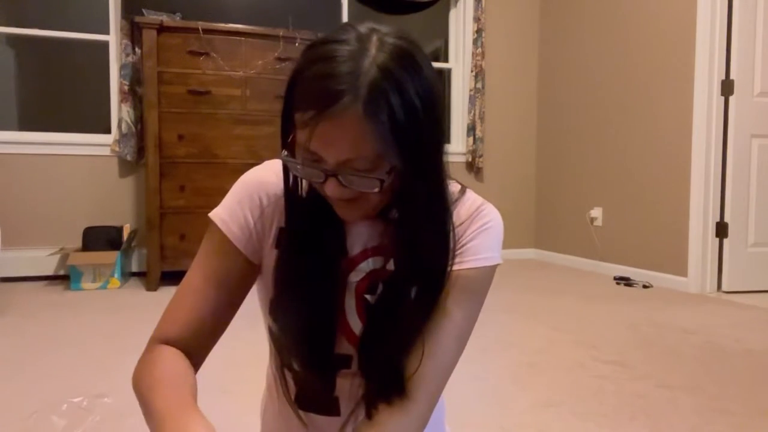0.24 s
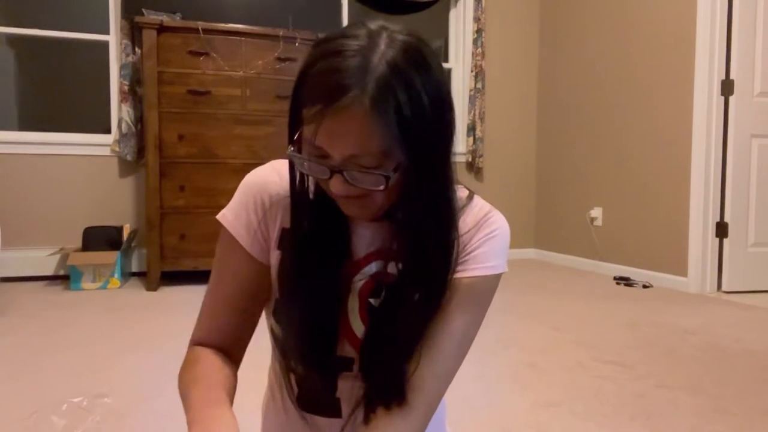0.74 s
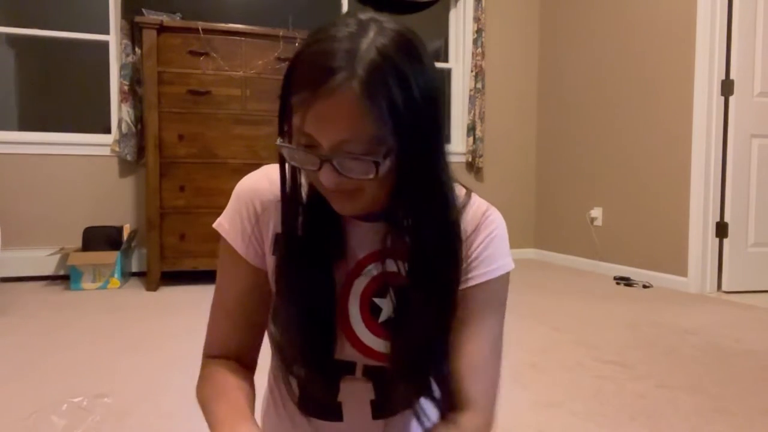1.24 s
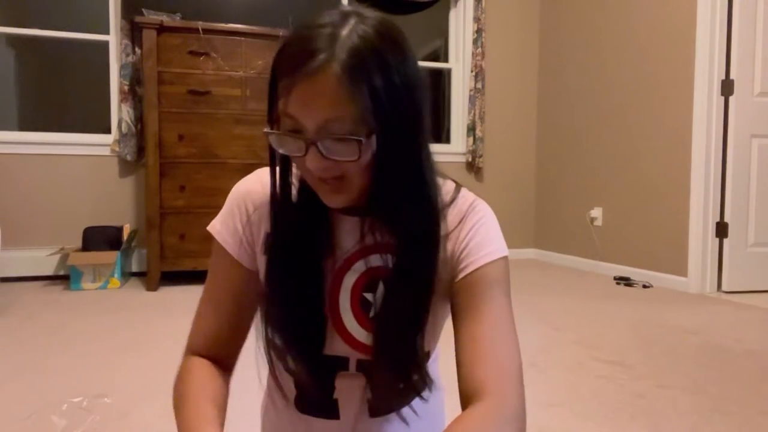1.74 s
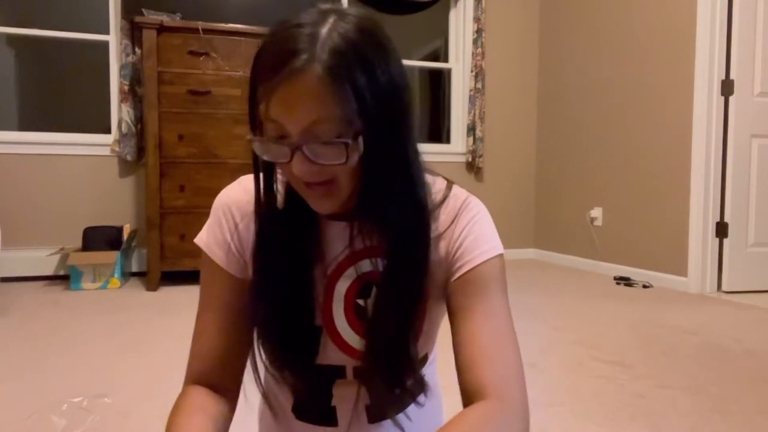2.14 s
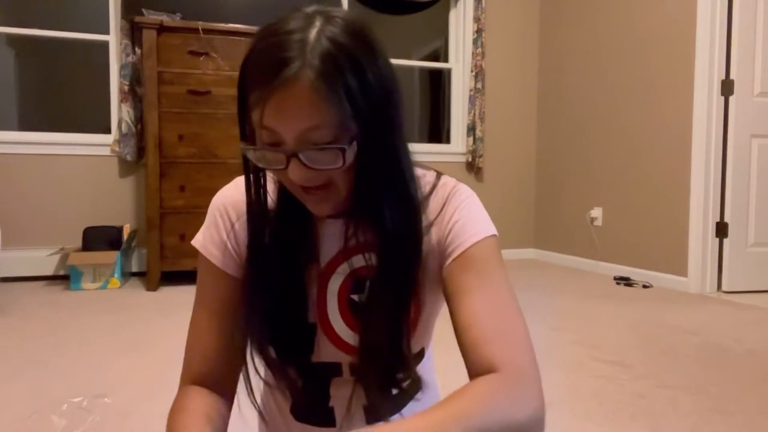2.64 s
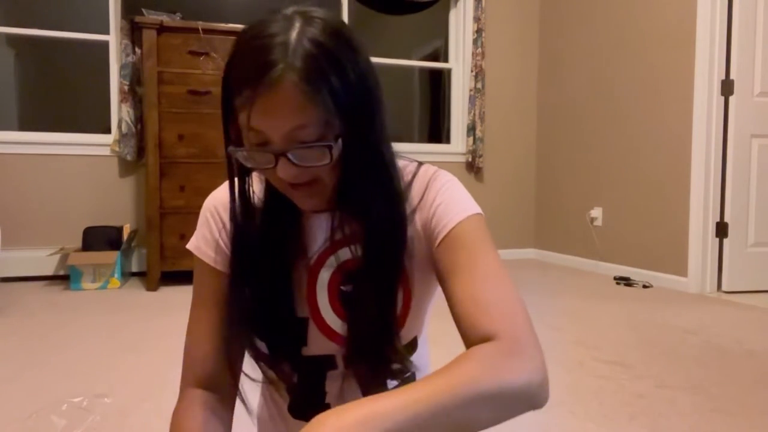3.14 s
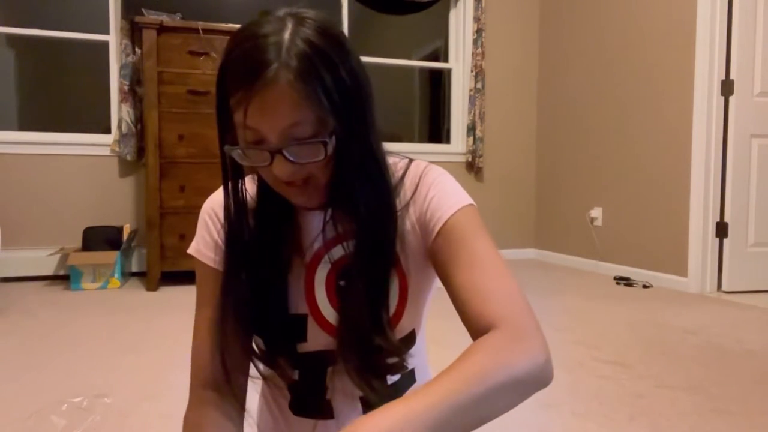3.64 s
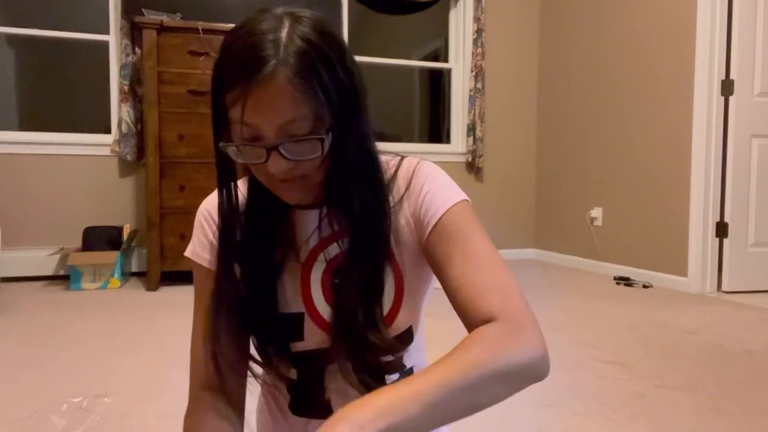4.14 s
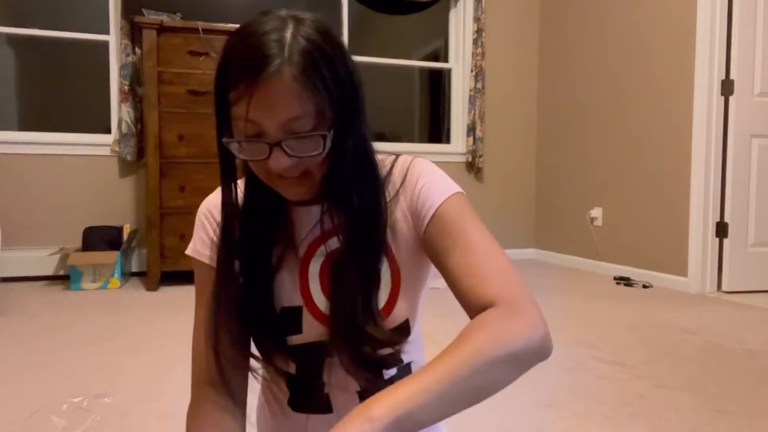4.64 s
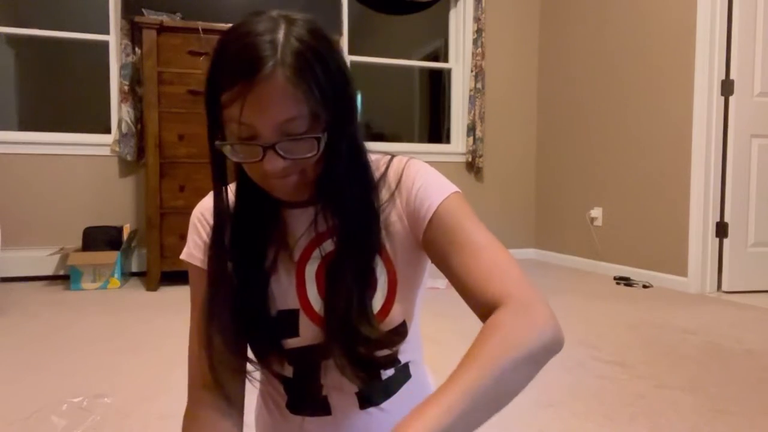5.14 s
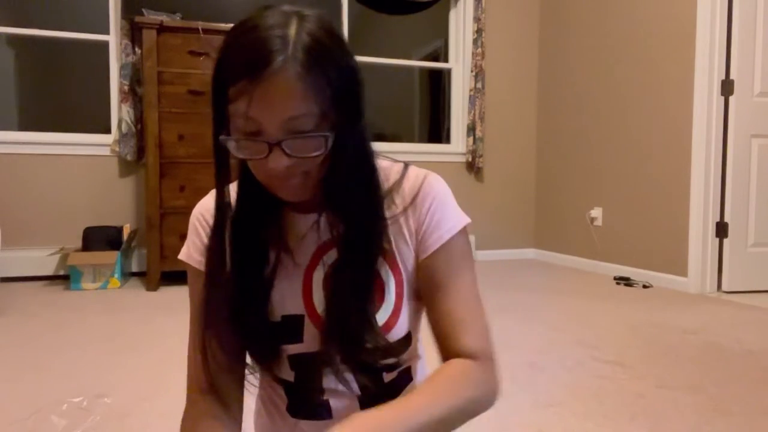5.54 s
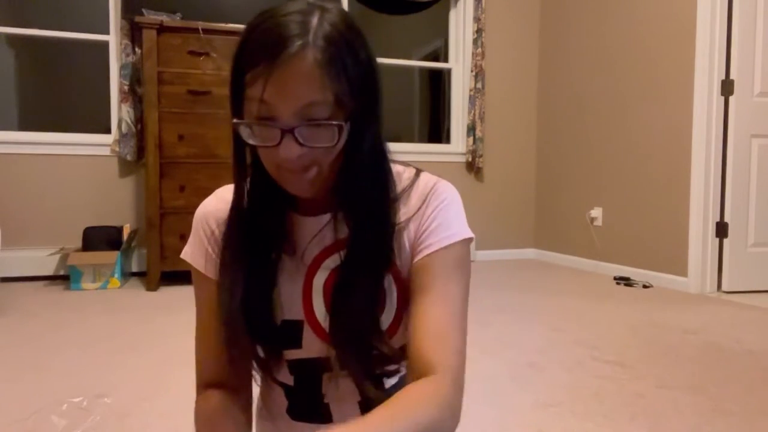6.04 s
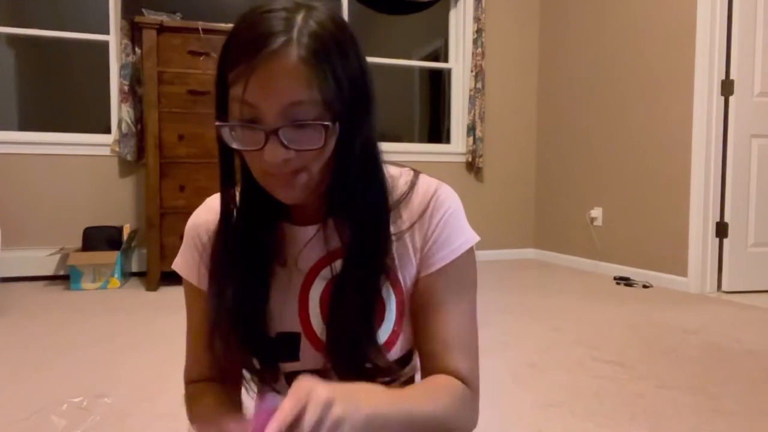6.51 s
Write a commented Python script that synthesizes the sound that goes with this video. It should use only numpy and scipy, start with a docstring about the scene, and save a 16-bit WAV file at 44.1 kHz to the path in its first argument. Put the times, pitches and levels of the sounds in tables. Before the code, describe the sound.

A cardboard box is pulled open by hand, close to a stereo microphone in a quiet carpeted bedroom with a faint hush. At about 0.06 and 0.33 s two short falling squeaks sound among hollow knocks and a few ticks; then near quiet until 0.9 s. From 1 to 2.5 s light snaps, papery rustle and dull wall slips come irregularly, busier near 1.8-2 s. A firm snap lands at 2.6 s, crackle builds from 2.8 s, and two loud bright cracks hit at 3.23 and 3.49 s. Small ticks follow, with a faint rough creak near 4 s, sharp pops around 4.3 s, a strong crackling rip at 4.7 s and a tight burst of cracks at 5.0 s. Soft low thumps lie beneath. After 5.5 s only hollow bumps, light rustle, one small snap near 6.57 s and muffled carpet scuffs from 6.1 s remain.

```python
"""Fibres and glue snap one by one or rip in bursts as hands work a cardboard box open on a bedroom carpet.
Snaps are short noise cracks over ringing flaps; rustle and box boom are grainy noise driven by the tugs.
Walls slip with gritty decaying tones and squeak with gliding ones; the base scuffs the pile in dull hiss.
Weight thumps the floor with one wavering low note. A two-port microphone hears it all close from above,
with a little room and a faint hush."""
import sys
import numpy as np
from scipy import signal
from scipy.fft import rfft, irfft, next_fast_len
from scipy.io import wavfile
from scipy.ndimage import uniform_filter1d

SR = 44100
rng = np.random.default_rng(int(sys.argv[2]) if len(sys.argv) > 2 else 0)


def wav_out(sig):
    """Save sig, one row per channel (or a flat mono array), as 16-bit PCM at SR to the path in sys.argv[1]."""
    wavfile.write(sys.argv[1], SR, np.round(np.clip(np.atleast_2d(sig).T, -1, 1) * 32767).astype(np.int16))


N = 298682  # length in samples

# Single snaps. Each row: time of the crack's peak in seconds, peak of the flap layer in dB,
# pitch of the freed flap in Hz, board note relative to the flap layer in dB.
SNAPS = [(.185, -51, 3000, -11), (0.298, -41, 2070, -29), (0.433, -43, 3580, -24), (0.4439, -32, 3900, -28),
         (1.0056, -40, 2060, -13.5), (1.148, -38.5, 2500, -10), (1.499, -34, 2340, -48),
         (1.5837, -40.5, 2140, -17), (1.7718, -36.5, 2620, -11), (1.7875, -32, 1720, -9),
         (1.839, -37.5, 2460, -8), (1.922, -41, 1940, -18), (2.0193, -37, 1590, -11),
         (2.185, -35.5, 6600, 1.5), (2.217, -34.5, 1890, -4), (2.472, -39, 1810, -10),
         (2.488, -43.5, 1860, -16), (2.505, -42.5, 1920, -15), (2.608, -24.5, 1960, -6.5),
         (2.769, -47.5, 3000, -9), (2.82, -36.5, 6300, -52), (2.857, -31, 4800, -37),
         (2.917, -33.5, 4030, -38), (2.946, -43.5, 4000, -42), (2.979, -39.5, 2940, -37),
         (3.1186, -39.5, 3800, -12.5), (3.1812, -40.5, 1900, -6.5), (3.193, -48, 2000, -4),
         (3.2084, -37.5, 3920, -21), (3.2155, -36, 3600, -12), (3.2277, -10, 2920, -21.5),
         (3.42, -46, 2100, -31), (3.4492, -39, 1550, -6), (3.459, -32.5, 3500, -11),
         (3.4915, -12.5, 5360, -29), (3.547, -45, 3000, -5), (3.5646, -37, 3000, -2),
         (3.664, -48, 2960, -2), (3.699, -46.5, 2480, -4), (3.742, -43, 3650, -11), (3.757, -47.5, 5000, 1),
         (3.777, -49, 2500, 3), (3.854, -39, 1340, -0.5), (3.893, -40.5, 1530, 1),
         (3.9256, -49.5, 1980, 2.5), (3.974, -45.5, 3100, -11), (3.986, -40.5, 5000, -20),
         (3.999, -42.5, 2120, -32), (4.011, -34, 1960, -9), (4.033, -53, 1590, -14),
         (4.165, -55.5, 2000, -8), (4.18, -45, 2000, -8), (4.2702, -26, 1600, -8),
         (4.3229, -22.5, 5060, -32), (4.3263, -17, 6050, -13), (4.3522, -30.5, 6900, -30),
         (4.4123, -33, 1710, -5.5), (4.675, -37.5, 1890, -11), (4.693, -32, 2270, -11),
         (4.727, -27, 1750, -7), (4.7403, -21, 1790, -13), (4.769, -22.5, 5500, -38),
         (4.854, -47.5, 2700, -18), (4.873, -42.5, 2610, -15), (4.897, -42.5, 2940, -30),
         (4.944, -42.5, 2570, -19), (4.9656, -32, 2460, -30), (4.982, -29, 5940, -35),
         (5.0061, -16.5, 6160, -64), (5.017, -16, 6200, -42), (5.019, -15.5, 4920, -38),
         (5.0233, -19, 3170, -22), (5.4201, -41.5, 3680, -6), (5.467, -36, 3305, -12),
         (6.5667, -38, 3350, -4.5)]
# Resonances of the flaps around a snap. Each row: pitch in Hz, relative level in dB.
FLAP_MODES = [(1750, -22.5), (2030, -0.5), (2650, -2), (3400, -10.5), (4700, -6), (6500, 6)]
SNAP_S, SNAP_SLOWING = 0.0002, 0.035  # parting time at full scale; weak snaps lengthen it, fraction per dB
CRACK_DB, CRACK_GROWTH = -3.5, 0.0222  # bright crack against the flap layer; dB more per dB of snap level
GRIT_DB, GRIT_GROWTH = -8, -0.26  # grit against the swing; negative growth makes weak snaps grittier
FLAP_CYCLES = 1  # the swing fades by a factor e in this many cycles
FLAP_T60_CYCLES = 45  # each mode drops 60 dB in this many of its own cycles
FLAP_REACH_DB = 11  # modes fade this much per octave from the flap's pitch
FLAP_RING_DB, FLAP_SCATTER = -8.5, 0.03  # modes against the swing; largest pitch shift as a fraction

# Tugs and rips. Each row: peak in seconds, rise in seconds, fibre crackle in dB, board ring in dB,
# hollow boom in dB.
TUGS = [(0.073, 0.03, -57, -55.5, -49.5), (0.179, 0.18, -64.5, -102, -65), (0.296, 0.016, -64, -66, -59.5),
        (0.363, 0.057, -54, -55, -64), (0.456, 0.078, -55.5, -54.5, -63.5), (0.911, 0.055, -63.5, -66, -92),
        (1.087, 0.0074, -58, -59, -72), (1.15, 0.022, -81, -57, -61), (1.267, 0.19, -49, -64, -65),
        (1.499, 0.016, -55, -67, -64.5), (1.587, 0.053, -55, -68, -69), (1.663, 0.052, -59, -66.5, -93),
        (1.782, 0.013, -45.5, -50.5, -39.5), (1.93, 0.013, -56.5, -80, -69),
        (1.987, 0.1, -57.5, -53, -41.5), (2.038, 0.17, -57.5, -56, -62), (2.205, 0.021, -49.5, -50, -58),
        (2.336, 0.3, -62, -62, -63), (2.4, 0.086, -64, -59.5, -81), (2.609, 0.011, -43, -48, -42.5),
        (2.874, 0.057, -40, -59, -68), (3.245, 0.047, -44.5, -54, -57.5), (3.457, 0.019, -44.5, -61, -74),
        (3.505, 0.024, -43.5, -81, -84), (3.61, 0.0067, -54.5, -81, -84), (3.78, 0.17, -58, -65, -80),
        (4.019, 0.035, -49, -47, -86), (4.183, 0.0045, -53, -52, -60), (4.332, 0.084, -49.5, -48, -42),
        (4.428, 0.044, -63, -55.5, -49), (4.696, 0.012, -51, -45, -40), (4.738, 0.03, -34, -41, -44.5),
        (4.87, 0.14, -89, -64, -44.5), (5.023, 0.083, -43, -48, -44.5), (5.16, 0.031, -68, -68, -59.5),
        (5.466, 0.14, -60, -57.5, -56), (5.724, 0.081, -67, -57.5, -47.5),
        (5.882, 0.052, -61.5, -62.5, -56), (6.115, 0.0087, -67, -56.5, -46.5),
        (6.151, 0.068, -56.5, -63, -62), (6.421, 0.1, -81, -79, -53), (6.48, 0.063, -61.5, -74, -58),
        (6.58, 0.033, -62.5, -83, -54.5), (6.72, 0.058, -56, -64.5, -52)]
# Restless hands. Each row: time in seconds, crackle between tugs in dB, board ring between tugs in dB.
HANDLING = [(0, -99, -70), (.2, -70, -86), (.24, -105, -105), (.275, -64, -99), (.645, -98, -62.5),
            (.7, -111, -90), (.85, -105, -78.5), (1.06, -63, -66), (1.45, -80, -78), (2.14, -74, -69),
            (2.42, -67, -63.5), (2.76, -73, -73), (3.05, -57, -66), (3.39, -81, -65.5), (3.65, -77, -64.5),
            (4.15, -73, -63.5), (4.56, -57, -55.5), (4.68, -64, -65), (4.82, -62.5, -74), (5.15, -65, -58),
            (5.32, -63.5, -83.5), (5.62, -65, -80), (5.99, -84, -99), (6.09, -94, -87), (6.3, -73, -69.5),
            (6.77, -94, -59.5)]
HANDLING_HOLLOW_DB = -4  # boom between tugs against the board ring
RISE_DB = 20  # every swell climbs this much during its rise
FIBRE_FALL_DB_PER_S, BOARD_FALL_DB_PER_S, HOLLOW_FALL_DB_PER_S = 224.5, 184.5, 148.5
# Colour of the fibre crackle. Each row: frequency in Hz, relative density in dB per Hz.
FIBRE_COLOUR = [(710, -43), (1200, -38.5), (1550, -4), (2040, -5.5), (2970, -17.5), (6960, -3),
                (10400, -11), (13800, -12), (16100, -16), (16800, -76.5)]
# Flap resonances under a scrape. Each row: pitch in Hz, width in Hz, relative level in dB.
SCRAPE_MODES = [(1730, 390, -6), (2920, 84, -11), (2980, 1780, 12)]
# Board resonances. Each row: pitch in Hz, width in Hz, relative level in dB.
BOARD_MODES = [(700, 120, 4), (724, 81, 8), (878, 550, 20), (1015, 40, 27), (1200, 1500, 4)]
# Resonances of the hollow box. Each row: pitch in Hz, width in Hz, relative level in dB.
HOLLOW_MODES = [(94.4, 18, -12), (136.3, 62, -3.5), (216, 14.3, 5), (265, 29, 0), (335, 34.5, 1.5),
                (410.4, 32.2, -3)]

# Dull slips of one wall on another. Each row: start in seconds, peak level in dB, starting pitch in Hz.
SLIPS = [(.443, -45.5, 397), (1.146, -37.5, 377), (1.771, -44, 308), (1.783, -37, 338), (1.836, -37.5, 316),
         (1.923, -38.5, 333), (1.962, -32.5, 316), (1.981, -43, 327), (1.996, -40, 216), (2.03, -37.5, 214),
         (2.604, -43, 950), (3.228, -41, 403), (4.009, -41, 282), (4.32, -32, 230), (4.673, -34.5, 492),
         (4.694, -34.5, 620), (4.716, -39, 484), (4.806, -36, 513), (4.854, -36, 503), (4.874, -35.5, 505),
         (4.894, -38.5, 497), (4.92, -42, 493), (4.942, -37, 550), (4.956, -35.5, 580), (4.965, -32.5, 616),
         (5.694, -47, 237), (5.74, -41, 206), (5.864, -44.5, 212), (6.115, -51, 372), (6.151, -46, 220),
         (6.473, -41, 216), (6.564, -41.5, 181)]
SLIP_SAG, SLIP_GRIT_DB = 0.0055, -19  # pitch sag per nominal cycle; starting grit against the tone

# Squeaks and creaks. Each row: start in seconds, length in seconds, first pitch in Hz, last pitch in Hz,
# level in dB, half pitch relative to the main tone in dB, roughness from 0 to 1.
SQUEAKS = [(0.058, .043, 634, 562, -28.5, -38, 0.03), (0.334, 0.044, 583, 509, -38, -45, 0.2),
           (3.989, .185, 591, 621, -51, -0.5, 0.49), (4.972, 0.074, 555, 530, -64.5, 19.5, 0.05)]
OCTAVE_DB, SQUEAK_EDGES = -20.5, 0.76  # octave against the main tone; share spent swelling and dying

# The box scuffing the carpet. Each row: peak in seconds, hold in seconds, level in dB.
SCUFFS = [(6.13, 0.046, -61.5), (6.397, 0.034, -54.5), (6.561, 0.017, -55), (6.66, 0.15, -58)]
# Scuff resonances. Each row: pitch in Hz, width in Hz, relative level in dB.
SCUFF_MODES = [(680, 130, 5), (1240, 2100, -18)]
SCUFF_RISE_S, SCUFF_FALL_DB_PER_S = 0.011, 154

# Weight shifting on the floor. Each row: peak in seconds, hold in seconds, level in dB.
THUMPS = [(2.657, .01, -53.5), (3.59, 0.083, -60), (3.798, 0.18, -51.5), (4.358, 0.012, -48.5),
          (4.586, 0.012, -47), (4.774, 0.011, -42.5), (5.058, 0.012, -46.5), (5.483, 0.0083, -57),
          (5.75, 0.015, -62), (6.146, 0.0082, -64), (6.476, 0.051, -62)]
FLOOR_HZ, FLOOR_WAVER = 54, 0.19  # middle pitch; RMS waver as a fraction of it
THUMP_RISE_S, THUMP_FALL_DB_PER_S, RUMBLE_DB = 0.081, 268, -80  # the rumble never stops

# Early reflections. Each row: delay in seconds, level in dB.
ECHOES = [(.0021, -7), (0.0105, -15.5)]
# Decay of the room. Each row: frequency in Hz, time to fall 60 dB in seconds.
ROOM_DECAY = [(200, 0.83), (600, 0.6), (4000, 0.56), (12000, 0.011)]
ROOM_DB = -22  # total level of the late taps

# Phase between the ports. Each row: frequency in Hz, lead of the left port in radians.
PORT_LEAD = [(0, 0), (3700, -.2), (6460, 1), (7750, 2.8), (8870, 3.3), (10100, 6), (11600, 6.5),
             (12600, 9.1), (14400, 9.9), (15200, 12.5)]
# Balance between the ports. Each row: frequency in Hz, left minus right in dB.
PORT_TILT = [(60, 5.5), (180, 2.5), (550, 4), (1650, -1), (4970, -4.5), (15000, 3.5)]
LOW_CUT_HZ, EDGE_HZ = 61.5, 16700  # bass cut and upper band limit

# Colour of the background hush. Each row: frequency in Hz, relative density in dB per Hz.
HUSH_COLOUR = [(30, -4.5), (713, -14.5), (835, -13), (1310, -19), (2200, -25.5), (7090, -38.5),
               (16500, -53.5)]
HUSH_DB = -77.5


def snaps():
    """The freed flap and its neighbouring modes ring under a bright crack; the board adds a low note."""
    out, t = np.zeros(N), np.arange(1024) / SR
    noise = rng.standard_normal((len(SNAPS), 1024))
    picks = rng.random((len(SNAPS), 1 + len(FLAP_MODES)))
    middle = signal.butter(2, (1300, 6500), "band", fs=SR)
    treble = signal.butter(2, (4000, 15000), "band", fs=SR)
    mode_hz, mode_db = np.transpose(FLAP_MODES)[..., None]
    for (s, db, hz, note_db), hiss, (share, *shifts) in zip(SNAPS, noise, picks):
        parting = SNAP_S * np.exp(-SNAP_SLOWING * db)
        burst = hiss * t / parting * np.exp(-t / parting)
        # each snap shifts the modes a little
        moved = mode_hz * (1 + FLAP_SCATTER * (2 * np.reshape(shifts, (-1, 1)) - 1))
        distance_db = FLAP_REACH_DB * abs(np.log2(moved / hz))
        decay_db = 60 * t * moved / FLAP_T60_CYCLES
        rings = amp(mode_db - distance_db - decay_db) * np.sin(2 * np.pi * moved * t)
        swing = np.sin(2 * np.pi * hz * t) * np.exp(-hz * t / FLAP_CYCLES)
        flap = peaked(swing) + amp(FLAP_RING_DB) * peaked(rings.sum(0))
        grit = amp(GRIT_GROWTH * db + GRIT_DB) * peaked(burst)
        body = peaked(signal.lfilter(*middle, flap + grit))
        crack = amp(CRACK_DB + CRACK_GROWTH * db) * peaked(signal.lfilter(*treble, burst))
        note = np.sin(2 * np.pi * (870 + 200 * share) * t)
        note *= (1 - np.exp(-t / 0.00014)) * amp(-60 * t / 0.036)
        # start early so the burst's envelope peaks on time
        add(out, s - parting, amp(db) * (body + crack + amp(note_db) * peaked(note)))
    return out


def rustle():
    """Fibres part in grains under each tug, fingers slide smoothly between; coarser catches ring the board."""
    torn = papery(grains(per_s=180, spread_db=1.5, length_s=0.0019, bed=0.63),
                  grains(per_s=200, spread_db=3.0, length_s=0.0021, bed=0.69))
    slid = papery(grains(per_s=290, spread_db=0.5, length_s=0.0057, bed=0.59),
                  grains(per_s=710, spread_db=14.5, length_s=0.005, bed=2.2))
    catches = grains(per_s=200, spread_db=2.2, length_s=.005, bed=.7)
    board = patchy(ring(catches, BOARD_MODES), patchy_db=2.2)
    tearing = effort(column=2, fall_db_per_s=FIBRE_FALL_DB_PER_S, between_db=-np.inf)
    sliding = amp(curve(HANDLING))
    catching = effort(column=3, fall_db_per_s=BOARD_FALL_DB_PER_S, between_db=curve(HANDLING, column=2))
    return tearing * torn + sliding * slid + catching * board


def papery(crackle, scrape):
    """Fine crackle over a duller scrape that sounds the flaps."""
    fine = evened(coloured(crackle, FIBRE_COLOUR))
    dull = amp(-4.0) * evened(ring(scrape, SCRAPE_MODES))
    return patchy(fine + dull, patchy_db=2.5)


def flex():
    """Uneven tugs shake the hollow box, whose resonances boom."""
    boom = ring(grains(per_s=91, spread_db=1.0, length_s=0.0077, bed=0.34), HOLLOW_MODES)
    between_db = curve(HANDLING, column=2) + HANDLING_HOLLOW_DB
    return effort(column=4, fall_db_per_s=HOLLOW_FALL_DB_PER_S, between_db=between_db) * evened(boom)


def slips():
    """Each slip is a soft, gritty push that rings one wall for a few cycles."""
    out, t = np.zeros(N), np.arange(3000) / SR
    for (s, db, hz), hiss in zip(SLIPS, rng.standard_normal((len(SLIPS), 3000))):
        turns = hz * t
        # the grit fades more slowly than the tone
        grit = evened(ring(hiss, [(1.09 * hz, 1.3 * hz, 0)])) * amp(SLIP_GRIT_DB + 1.1 * turns)
        tone = np.sin(2 * np.pi * np.log1p(SLIP_SAG * turns) / SLIP_SAG)
        push = amp(-6.5 * turns) * (1 - np.exp(-turns / 2.4))
        add(out, s, amp(db) * peaked(push * (tone + grit)))
    return out


def squeaks():
    """Stick and slip lock onto a wall's note; strong and weak slips in turn sound the half pitch."""
    out = np.zeros(N)
    for s, length, first_hz, last_hz, db, half_db, rough in SQUEAKS:
        size = round(length * SR)
        wander = rng.standard_normal((3, 9000))
        drift, *grips = (evened(uniform_filter1d(c, size=220)[:size]) for c in wander)
        hz = np.linspace(first_hz, last_hz, size) * (1 + 0.081 * rough * drift)
        angle = 2 * np.pi * np.cumsum(hz) / SR
        swell = signal.windows.tukey(size, SQUEAK_EDGES)
        whole, half = swell * (1 + rough * grips[0]), 1 + rough * grips[1]
        tone = whole * (np.sin(angle) + amp(OCTAVE_DB) * np.sin(2 * angle))
        tone += half * amp(half_db) * np.sin(angle / 2)
        add(out, s, np.sqrt(2) * amp(db) * tone * np.sqrt(swell))
    return out


def scuffs():
    """A smooth, dull hiss where the base slides on the pile."""
    s, hold, db = np.transpose(SCUFFS)
    hiss = ring(grains(per_s=1200, spread_db=11.0, length_s=0.0057, bed=0.48), SCUFF_MODES)
    return swells(s, SCUFF_RISE_S, db, SCUFF_FALL_DB_PER_S, hold) * evened(hiss)


def floor():
    """The floor answers each shift of weight with one low note that wavers."""
    waver = evened(uniform_filter1d(uniform_filter1d(rng.standard_normal(N), size=1500), size=1500))
    note = np.sin(2 * np.pi * np.cumsum(FLOOR_HZ * (1 + FLOOR_WAVER * waver)) / SR)
    s, hold, db = np.transpose(THUMPS)
    return (swells(s, THUMP_RISE_S, db, THUMP_FALL_DB_PER_S, hold) + amp(RUMBLE_DB)) * evened(note)


def ports(x):
    """The two ports hear the near box with their own phase and balance."""
    size = next_fast_len(N)
    hz = np.fft.rfftfreq(size, 1 / SR)
    lead = np.interp(hz, *np.transpose(PORT_LEAD))
    # half of the difference goes to each side
    half = amp(read(PORT_TILT, hz) / 2) * np.exp(.5j * lead)
    return irfft(rfft(x, size) * np.array([half, 1 / half]), size)[:, :N]


def room(x):
    """Early echoes and sparse taps, separate for each port, whose bands die at their own speed.
    The moving arms and flaps keep shading the reflections."""
    taps = np.zeros((2, SR // 2))
    # one tap at a random place in every 20 samples
    at = np.arange(400, SR // 2 - 20, 20) + rng.integers(0, 20, (2, (SR // 2 - 401) // 20))
    np.put_along_axis(taps, at, rng.choice([-1., 1.], at.shape), 1)
    hz, t, z = signal.stft(taps, SR, nperseg=256)
    decay = amp(-60 * t / read(ROOM_DECAY, hz)[:, None])
    tail = signal.istft(z * decay, SR, nperseg=256)[1]
    tail *= amp(ROOM_DB) / np.linalg.norm(tail[0])
    for s, db in ECHOES:
        tail[[0, 1], round(s * SR) + rng.integers(-30, 30, 2)] += amp(db)
    wet = signal.fftconvolve(x[None], tail, axes=1)[:, :N]
    return np.array([c.std() * patchy(c, patchy_db=4.5) for c in wet])


def hush():
    """A steady coloured hiss, mostly separate in each port."""
    common, own = rng.standard_normal(N), rng.standard_normal((2, N))
    return amp(HUSH_DB) * evened(coloured(common + 6.8 * own, HUSH_COLOUR))


def grains(per_s, spread_db, length_s, bed):
    """Noise let through in short puffs of unequal size over a steady bed."""
    hits = rng.exponential(1, N)
    size = amp(spread_db * np.minimum(hits, 3)) * (rng.random(N) < per_s / SR)
    puffs = signal.lfilter([1], [1, -np.exp(-1 / (length_s * SR))], size)
    return evened((bed + evened(puffs)) * rng.standard_normal(N))


def patchy(x, patchy_db):
    """Drifting patches of colour, as the grip moves to other parts of the board; unit RMS."""
    hz, t, z = signal.stft(x, SR, nperseg=512)
    field = rng.standard_normal(z.T.shape)
    for axis in (0, 1):
        field = uniform_filter1d(field, size=10, axis=axis)
    return evened(signal.istft(z * amp(patchy_db * evened(field).T), SR, nperseg=512)[1][:N])


def effort(column, fall_db_per_s, between_db):
    """How hard one part of the box is worked: the tugs over the handling between them."""
    rows = np.transpose(TUGS)
    return np.hypot(swells(rows[0], rows[1], rows[column], fall_db_per_s, 0), amp(between_db))


def swells(peaks_s, rises_s, levels_db, fall_db_per_s, holds_s):
    """Gain over time of events that swell to a peak, hold and die away, summed as power."""
    at = np.arange(0, N, 64)
    t = at / SR - np.reshape(peaks_s, (-1, 1))
    rise, level, hold = (np.reshape(c, (-1, 1)) for c in (rises_s, levels_db, holds_s))
    climb_db = np.minimum(RISE_DB * t / np.maximum(rise, .003), 0)
    db = level + climb_db - fall_db_per_s * np.maximum(t - hold, 0)
    return np.interp(np.arange(N), at, np.sqrt((amp(db) ** 2).sum(0)))


def ring(x, modes):
    """Passes x through resonances side by side, with alternating sign."""
    out = np.zeros(len(x))
    for k, (hz, width_hz, db) in enumerate(modes):
        out += (-1) ** k * amp(db) * signal.lfilter(*signal.iirpeak(hz, hz / width_hz, SR), x)
    return out


def coloured(x, points):
    """Filters x by a spectrum table."""
    size = next_fast_len(x.shape[-1])
    gain = amp(read(points, np.fft.rfftfreq(size, 1 / SR)))
    return irfft(rfft(x, size) * gain, size)[..., :x.shape[-1]]


def read(points, hz):
    """A spectrum table joined on a log-frequency axis."""
    f, value = np.transpose(points)
    return np.interp(np.log(hz + 1), np.log(f + 1), value)


def curve(rows, column=1):
    """One column of a table at every sample."""
    rows = np.array(rows)
    return np.interp(np.arange(N) / SR, rows[:, 0], rows[:, column])


def add(mix, s, sound):
    """Lays a sound into the mix at s seconds."""
    part = mix[round(s * SR):][:len(sound)]
    part += sound[:len(part)]


def amp(db):
    """Decibels to linear gain."""
    return 10 ** (np.asarray(db) / 20)


def evened(x):
    """Scales x to unit RMS."""
    return x / np.sqrt(np.mean(x ** 2) + 1e-20)


def peaked(x):
    """Scales x to unit peak."""
    return x / abs(x).max()


def scene():
    """The box heard directly and through the room, over the hush."""
    box = rustle() + flex() + floor() + snaps() + slips() + squeaks() + scuffs()
    return ports(box) + room(box) + hush()


def record(dry):
    """The microphone drops the deepest bass; then a steep filter limits the top of the band."""
    heard = signal.lfilter(*signal.butter(3, LOW_CUT_HZ, "high", fs=SR), dry)
    band_limit = signal.firwin(511, EDGE_HZ, window=("kaiser", 9), fs=SR)
    return signal.oaconvolve(heard, band_limit[None], "same")


dry = scene()
out = record(dry)
wav_out(out)
```